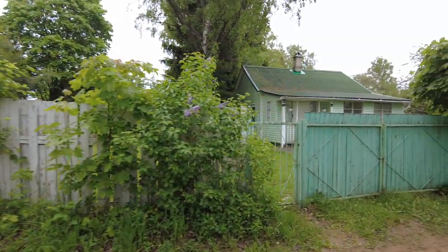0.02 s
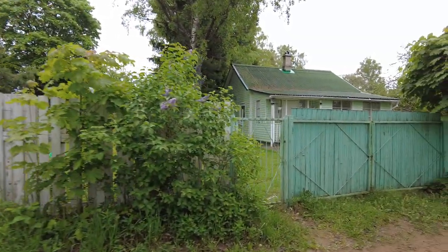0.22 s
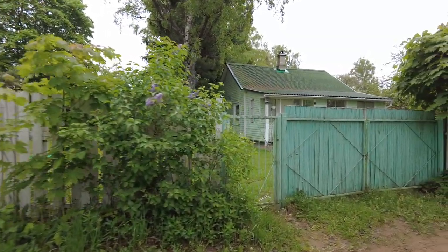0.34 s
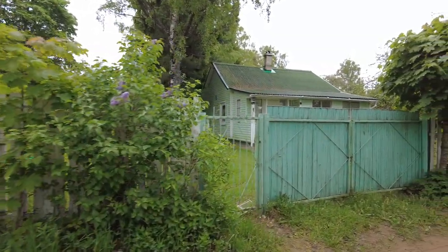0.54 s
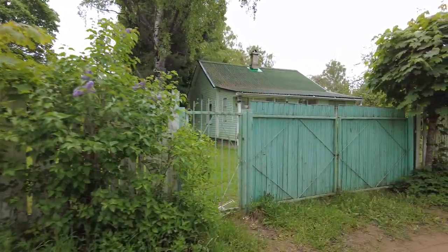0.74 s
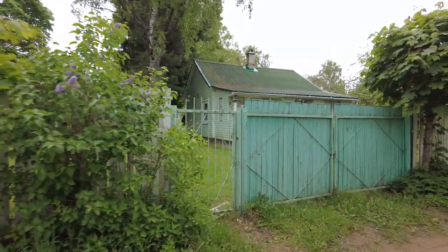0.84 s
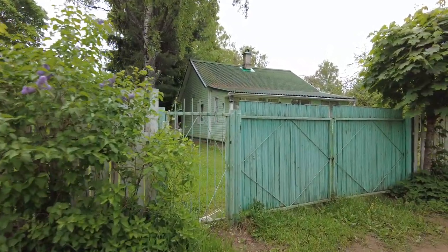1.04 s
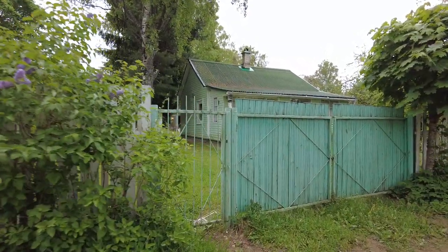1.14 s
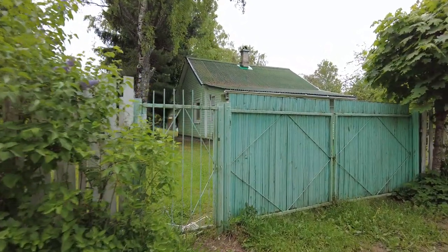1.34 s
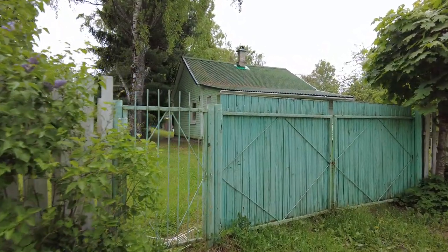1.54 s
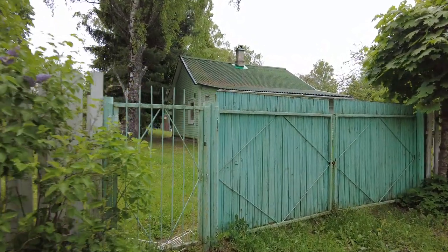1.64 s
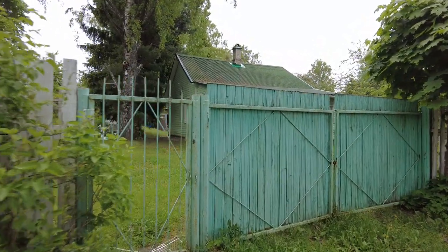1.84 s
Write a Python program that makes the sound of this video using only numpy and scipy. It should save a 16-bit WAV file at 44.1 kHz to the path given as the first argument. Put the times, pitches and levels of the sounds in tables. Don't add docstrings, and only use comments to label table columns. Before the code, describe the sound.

Shoes grind over loose dirt and pebbles, one sole scrapes sharply, a handheld camera body ticks

```python
import sys
import numpy as np
from scipy import signal
from scipy.fft import rfft, irfft
from scipy.io import wavfile
from scipy.ndimage import uniform_filter1d

SR = 44100
rng = np.random.default_rng(int(sys.argv[2]) if len(sys.argv) > 2 else 0)


def level_to_linear(level):
    exponent = np.asarray(level, float) / 20
    return 10 ** exponent


def unload_wav(signal):
    wavfile.write(
        sys.argv[1],
        SR,
        np.round(np.clip(np.atleast_2d(signal).T, -1, 1) * 32767).astype(np.int16),
    )


N = 83790
TIME = np.arange(N) / SR
FREQ = np.maximum(np.arange(N // 2 + 1) * SR / N, 1)


def curve(table):
    return level_to_linear(np.interp(TIME, *np.array(table).T[:2]))


def along_log_freq(table):
    hz, value = np.array(table).T[:2]
    return np.interp(np.log(FREQ), np.log(hz), value)


def shape(table):
    return level_to_linear(along_log_freq(table))


def colour(x, gain):
    y = irfft(rfft(x) * gain, N)
    return y / y.std()


def walk(rate_hz):
    k = max(int(SR / rate_hz), 1)
    smooth = uniform_filter1d(uniform_filter1d(rng.standard_normal(N), k), k)
    return smooth / smooth.std()


def grit(rate_hz, spread_db, bed_db):
    chance, size_draw, sign_draw = rng.random((3, N))
    size = level_to_linear(spread_db * np.minimum(-np.log(1 - size_draw), 4))
    grains = (chance < rate_hz / SR) * size * np.sign(sign_draw - .5)
    return grains / grains.std() + level_to_linear(bed_db) * rng.standard_normal(N)


def add(out, at_s, x):
    i = max(int(at_s * SR), 0)
    out[i:i + len(x)] += x[:N - i]


def steps():
    # start_s, level_db
    weight = [(0, -55), (.06, -85), (.21, -53.5), (.38, -58.5), (.56, -62.5), (.62, -62.5), (.666, -58.5),
              (.70, -43.5), (.80, -53), (.93, -55), (1.03, -64), (1.18, -102), (1.29, -63.5), (1.36, -47),
              (1.47, -62.5), (1.6, -70), (1.7, -90.5), (1.9, -72)]
    # freq_hz, density_db
    crunch_colour = [(150, -2), (400, -4), (1000, -10), (2100, -10), (2900, -6), (4500, -15), (9000, -25),
                     (16000, -36)]
    # freq_hz, density_db
    sole_colour = [(50, -13), (100, 2), (200, 4.5), (350, -0.5), (700, -9.5), (1500, -42), (4000, -78)]
    # middle_s, length_s, level_db, bright_share_db
    slides = [(.01, 0.081, -51.5, -36), (0.198, 0.012, -61.5, -18), (0.613, 0.055, -52, -28),
              (0.716, 0.037, -42.5, -3.5), (0.797, 0.031, -59.5, -10), (0.851, 0.12, -50.5, -12),
              (0.97, 0.061, -53, -2.5), (1.051, 0.074, -62.5, 6), (0.909, 0.012, -57, 3),
              (1.31, 0.04, -64, -6), (1.362, 0.035, -60, -8), (1.469, 0.0086, -58.5, -7),
              (1.571, 0.058, -77, 11), (1.894, 0.043, -75, -24), (0.173, 0.68, -62.5, -0.5),
              (0.46, 0.3, -65, -14), (1.448, 0.18, -69.5, -5), (1.198, 0.59, -70, 0.5),
              (1.543, 0.086, -67.5, 4), (1.848, 0.09, -77.5, 5)]
    # freq_hz, density_db
    slide_colour = [(300, -21.5), (1000, -17.5), (3000, -14), (6500, -13), (9000, -19.5), (16000, -30)]
    # freq_hz, density_db
    bright_colour = [(4000, -13.5), (8000, -2), (11000, -2.5), (13500, -13), (16000, 1)]
    crunch = colour(grit(700, 3.2, -2) * level_to_linear(2.6 * walk(120)), shape(crunch_colour))
    sole = level_to_linear(-2) * colour(grit(150, 4, 2), shape(sole_colour))
    sand = grit(5000, 2.4, 1) * level_to_linear(1.6 * walk(300))
    coarse, fine = np.zeros(N), np.zeros(N)
    for middle_s, length_s, level_db, bright_db in slides:
        swell = level_to_linear(level_db) * np.exp(-(2 * (TIME - middle_s) / length_s) ** 2)
        coarse += swell
        fine += swell * level_to_linear(bright_db)
    sliding = colour(sand, shape(slide_colour)) * coarse + colour(sand, shape(bright_colour)) * fine
    return (crunch + sole) * curve(weight) + sliding


def hush():
    # freq_hz, density_db
    hush_colour = [(300, 0), (600, -6), (1300, -10), (2400, -20), (4500, -15), (8000, -24), (12000, -27),
                   (14000, -38)]
    gain = shape(hush_colour) * np.minimum(FREQ / 300, 1) ** 2
    mid = colour(rng.standard_normal(N), gain)
    side = colour(rng.standard_normal(N), gain)
    return level_to_linear(-71.5) * (mid + 1.1 * side * np.array([[1], [-1]]))


def wind():
    # start_s, level_db
    gusts = [(0.0, -94), (0.014, -67.5), (0.21, -66), (0.254, -51.5), (0.454, -67), (0.682, -63.5),
             (0.746, -57), (0.776, -56), (1.396, -64.5), (1.55, -55.5), (1.634, -64), (1.692, -67),
             (1.762, -68), (1.9, -54.5)]
    # freq_hz, density_db
    wind_colour = [(20, 0), (40, 1.5), (70, -7), (130, -17), (260, -21), (500, -28.5), (1000, -40),
                   (2500, -72)]
    rumble = rng.standard_normal(N) * level_to_linear(3.2 * walk(18.0))
    return colour(rumble, shape(wind_colour)) * curve(gusts) * level_to_linear(6.5)


def thumps():
    # start_s, peak_db, pitch_hz
    pushes = [(0.056, -44.5, 151), (0.125, -46, 164), (0.236, -32, 314), (0.366, -39, 132),
              (0.494, -52.5, 171), (.685, -44, 280), (0.72, -37.5, 323), (0.810, -48.5, 200),
              (0.876, -67, 180), (0.987, -42, 260), (1.015, -44.5, 380), (1.03, -44, 610),
              (1.04, -47.5, 200), (1.293, -39.5, 197), (1.341, -39, 144), (1.379, -41, 370),
              (1.462, -43, 193), (1.631, -47, 148), (1.802, -41.5, 89)]
    out, t = np.zeros(N), TIME[:2200]
    for start_s, peak_db, hz in pushes:
        u = 3 * t * hz / 0.94
        add(out, start_s, level_to_linear(peak_db + 4.5) * np.sin(2 * np.pi * hz * t) * u * np.exp(1 - u))
    return out


def ticks():
    # start_s, peak_db, high_mode_share_db
    knocks = [(0.1252, -42.5, -2), (0.317, -34, 3), (0.4857, -35.5, -1), (0.8437, -46.5, 3.5),
              (0.8733, -36.5, -5), (0.9231, -39, -2.5), (0.9349, -39.5, -2.5), (1.3652, -35.5, -8),
              (1.3973, -40.5, -6), (1.5121, -32.5, -0.5), (1.6396, -53, -15), (1.8621, -45.5, 4.5)]
    # freq_hz, level_db, t60_s
    modes = [(350, -13.5, 0.036), (905, -13, 0.026), (1290, -16, 0.04), (1810, -2, 0.015),
             (2720, -6, 0.009), (4394, 1, 0.006), (5300, -3, 0.003), (7000, -9, 0.002)]
    out, t = np.zeros(N), TIME[:2200]
    attack = 1 - np.exp(-t / 0.00011)
    scatter = 1 + .015 * rng.standard_normal((len(knocks), len(modes)))
    for (start_s, peak_db, high_db), detune in zip(knocks, scatter):
        knock = np.zeros(len(t))
        for (hz, mode_db, t60_s), factor in zip(modes, detune):
            level = level_to_linear(mode_db + (high_db if hz > 2200 else 0))
            knock += level * np.sin(2 * np.pi * hz * factor * t) * attack * 1000. ** (-t / t60_s)
        add(out, start_s, -level_to_linear(peak_db + 5.5) * knock)
    return out


def cracks():
    # start_s, peak_db, centre_hz
    snaps = [(.1958, -41, 3200), (.2354, -19, 3480), (.6749, -46, 1300), (.6863, -42, 3130),
             (.7464, -42, 2940), (.7654, -45, 2650), (.8033, -34, 2640), (.9053, -35, 6640),
             (.9190, -41, 6500), (.953, -46, 9000), (1.1149, -50, 8000), (1.3135, -36, 2940),
             (1.3140, -38, 7200), (1.3142, -40, 12500), (1.3493, -35, 3210), (1.3540, -44, 7000),
             (1.3580, -35, 3300), (1.3660, -33, 7300), (1.4197, -46, 1700), (1.4345, -49, 1800),
             (1.5918, -45, 5990), (1.6064, -50, 6120), (1.4952, -52, 7200), (.7105, -39, 2900),
             (.7335, -42, 1800), (.8315, -43, 3000), (.9082, -39, 4600), (.9222, -42, 6500),
             (.2445, -13, 3100), (.2525, -11, 3400), (.2560, -11, 3300), (.2605, -11, 3100),
             (.2650, -10, 3000), (.2905, -17, 4000)]
    burst_s, ring_q, ring_db = .0006, 2.8, 3
    out, t = np.zeros(N), TIME[:400]
    envelope = t / burst_s * np.exp(1 - t / burst_s) / 2
    noise = rng.standard_normal((len(snaps), len(t)))
    for (start_s, peak_db, hz), n in zip(snaps, noise):
        burst = np.sign(n) * np.sqrt(np.abs(n)) * envelope
        ring = np.sin(2 * np.pi * hz * t) * np.exp(-np.pi * hz * t / ring_q)
        ringing = np.convolve(burst, ring)[:len(t)] / np.linalg.norm(ring)
        level_db = peak_db + 2.5 - 7 * (peak_db > -22)
        add(out, start_s, level_to_linear(level_db) * (burst + level_to_linear(ring_db) * ringing))
    return irfft(rfft(out) * np.minimum(FREQ / 900, 1) ** 2, N)


def scuff():
    # start_s, level_db
    envelope = [
        (.226, -88.5),
        (.2345, -52.5),
        (.2355, -18.5),
        (.262, -12.5),
        (.292, -20.5),
        (.300, -29.5),
        (.33, -42.5),
        (.40, -58),
        (.46, -86),
    ]
    # freq_hz, density_db
    scuff_colour = [(120, -46), (300, -13.5), (800, -9.5), (1400, -13), (2200, -19), (3300, -2), (6400, 1),
                    (16000, -6)]
    # freq_hz, width_hz, gain_db
    peaks = [(1510, 170, 15.5), (3070, 1000, 7.5), (9470, 1720, 0.5)]
    ring = sum((level_to_linear(db) - 1) / (1 + (2 * (FREQ - hz) / width_hz) ** 2) for hz, width_hz, db in peaks)
    jerks = grit(8000, 1.2, -2.25) * level_to_linear(1.5 * walk(620))
    return colour(jerks, shape(scuff_colour) * (1 + ring)) * curve(envelope)


def ports(x, scattered, shade, phases):
    # freq_hz, gain_db
    left_shading = [(250, 0), (700, -.8), (2000, -3.0), (4000, -4.5), (8000, -5.8), (14000, -4.3)]
    # freq_hz, gain_db
    unrelated = [(60, -28), (300, -15), (1500, -10), (8000, -8)]
    turn = np.exp(1j * along_log_freq(phases))
    tilt = shape(left_shading) ** (shade / 2)
    common, other = rfft(x), rfft(scattered) * shape(unrelated)
    return irfft(np.array([turn * (common + other) * tilt, (common - other) / tilt]), N)


def drop_band_mean(tear):
    centre_hz, width_hz, middle_s, length_s = 5250, 950, .26, .044
    held = np.exp(-(2 * (TIME - middle_s) / length_s) ** 8)
    band = np.exp(-(2 * (FREQ - centre_hz) / width_hz) ** 4)
    return tear - held * irfft(rfft(tear.mean(0)) * band, N)


def scene():
    # freq_hz, phase_rad
    scuff_turn = [(150, -.1), (430, -.7), (700, -3.1), (1550, -6.9), (3200, -7.6), (5200, -9.4),
                  (10500, -10.4), (15200, -13.0)]
    # freq_hz, phase_rad
    far_turn = [(150, -.1), (900, -2.5), (1800, -.9), (2900, -1.1), (4000, -2.2), (5500, -2.5),
                (7500, -3.3), (14000, -5.6)]
    # freq_hz, phase_rad
    near_turn = [(150, -.1), (900, -1.1), (2900, -.7), (5300, -3.1), (6200, -1), (7700, -1.2), (9300, -2.4),
                 (14000, -4.7)]
    # freq_hz, phase_rad
    housing_turn = [(150, 0), (900, .7), (2900, 1.3), (4000, .3), (4800, .4), (5600, 1.1), (6600, 2.3),
                    (8000, 1.3)]
    change_foot_s = 1.2
    ground, spread = steps() + cracks(), steps()
    later = np.clip((TIME - change_foot_s) * 20 + .5, 0, 1)
    far_foot = ports(ground * (1 - later), spread * (1 - later), 0.87, far_turn)
    near_foot = ports(ground * later, spread * later, 0.99, near_turn)
    tear = ports(scuff(), level_to_linear(3.5) * scuff(), 0.91, scuff_turn)
    road = drop_band_mean(tear + far_foot + near_foot)
    hand = thumps() + ticks()
    housing = ports(hand, hand, 0.23, housing_turn)
    return level_to_linear(-6.0) * (road + housing) + wind() + hush()


def roll_off(x):
    return signal.sosfilt(signal.butter(12, 17000, fs=SR, output="sos"), x)


def record(dry):
    top_hz = 15900
    dull = level_to_linear(-35 * np.clip((FREQ - top_hz) / 400 + .5, 0, 1))
    mix = irfft(rfft(dry) * dull, N)
    return roll_off(mix)


dry = scene()
out = record(dry)
unload_wav(out)
```